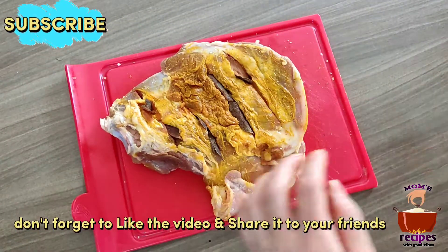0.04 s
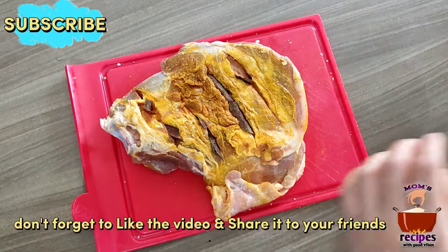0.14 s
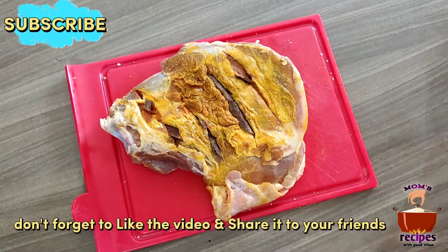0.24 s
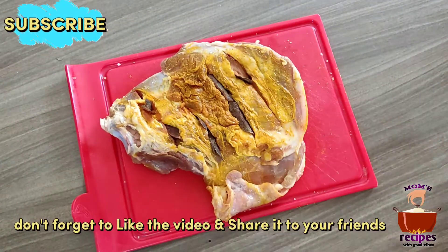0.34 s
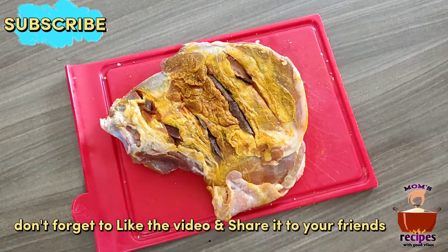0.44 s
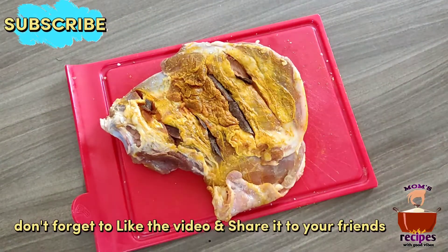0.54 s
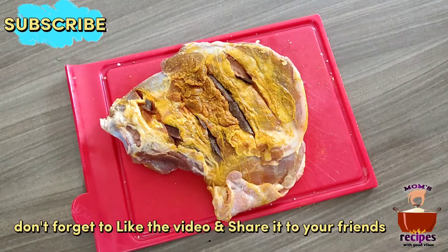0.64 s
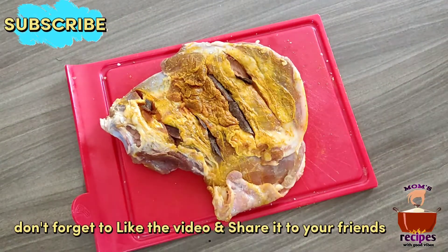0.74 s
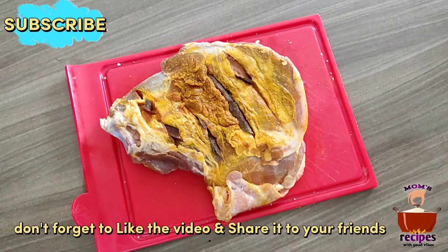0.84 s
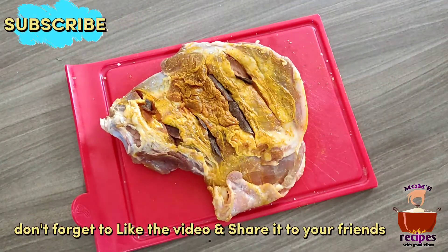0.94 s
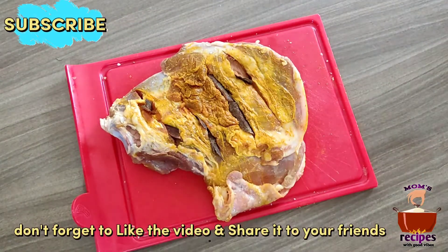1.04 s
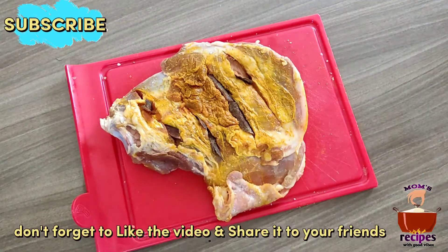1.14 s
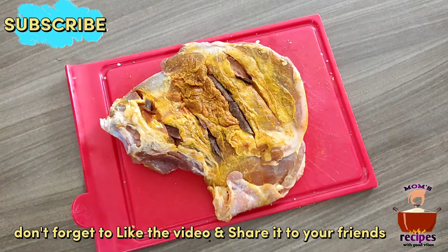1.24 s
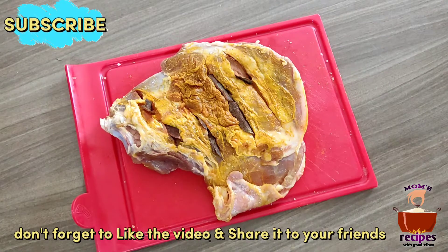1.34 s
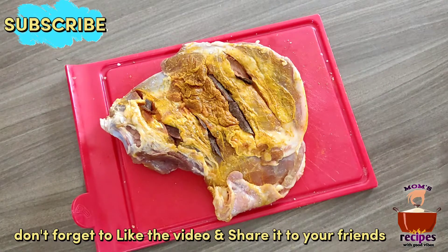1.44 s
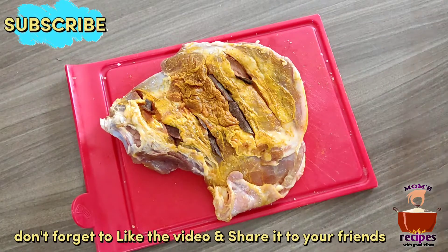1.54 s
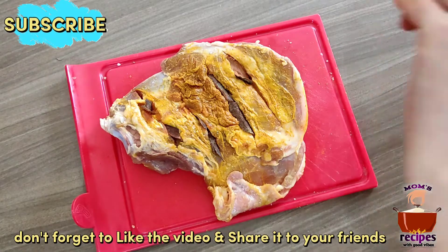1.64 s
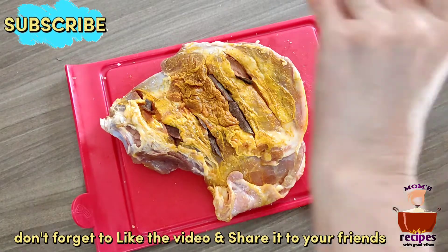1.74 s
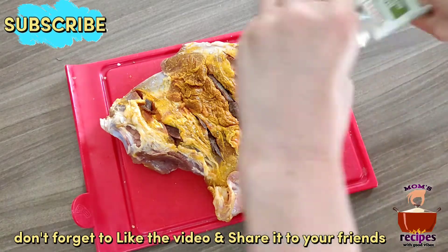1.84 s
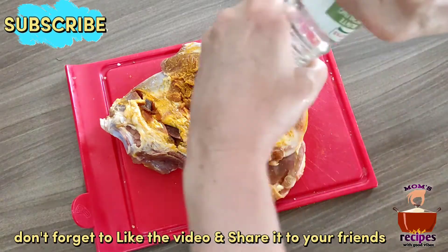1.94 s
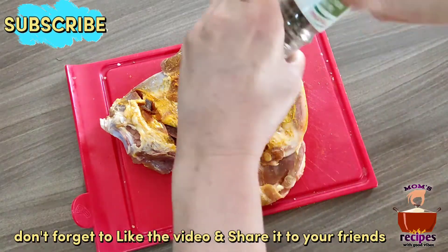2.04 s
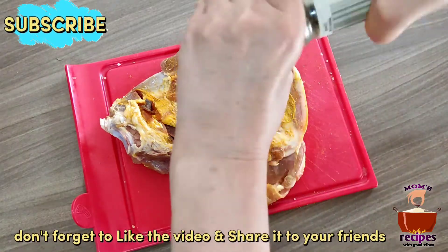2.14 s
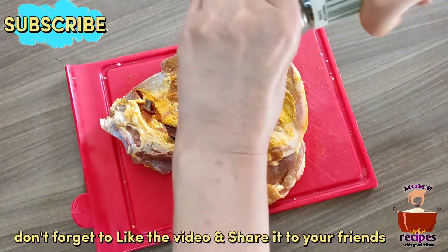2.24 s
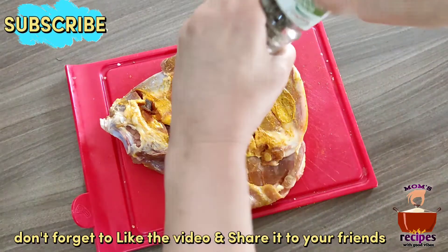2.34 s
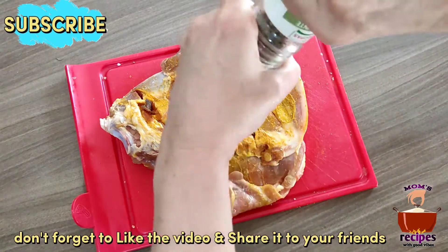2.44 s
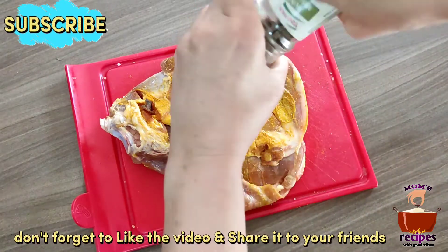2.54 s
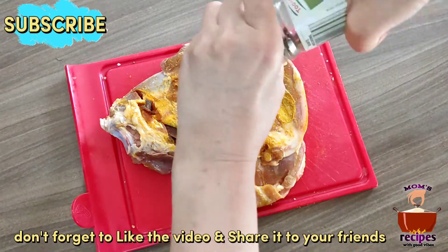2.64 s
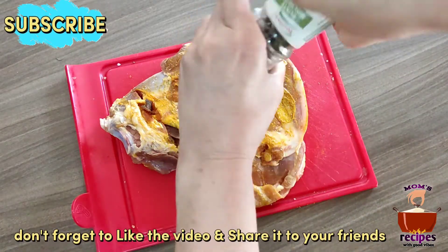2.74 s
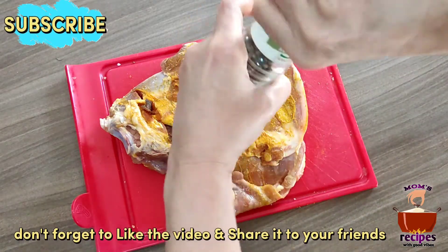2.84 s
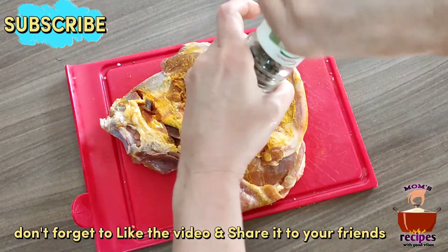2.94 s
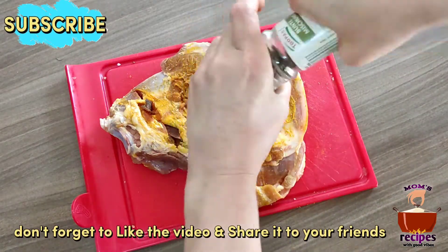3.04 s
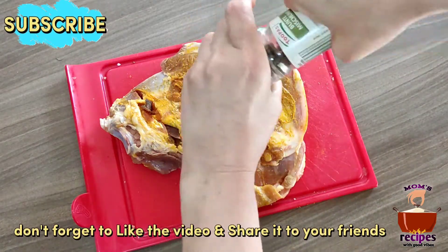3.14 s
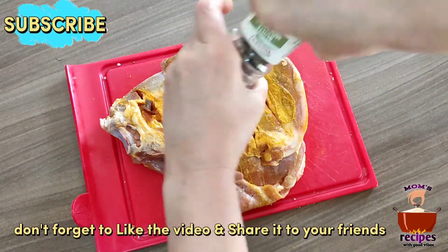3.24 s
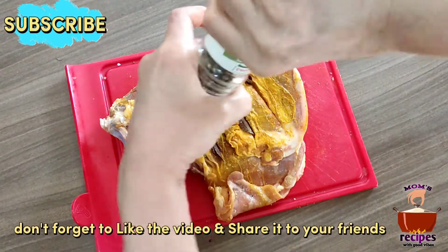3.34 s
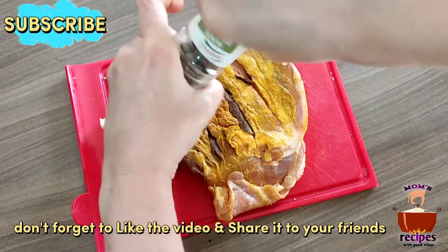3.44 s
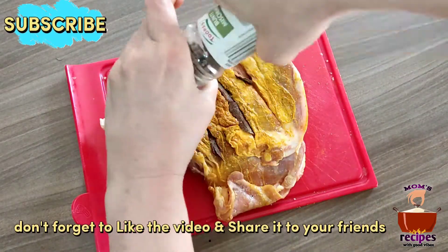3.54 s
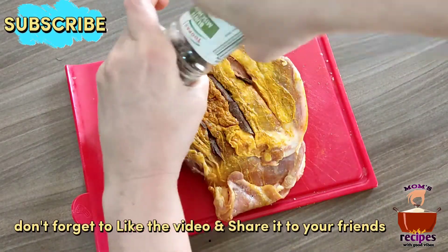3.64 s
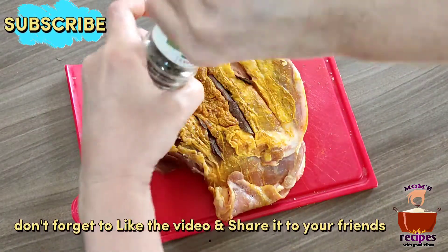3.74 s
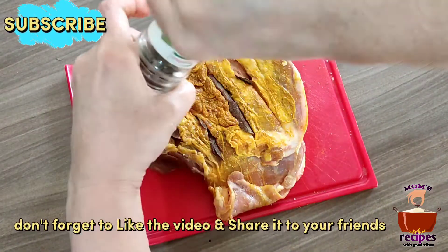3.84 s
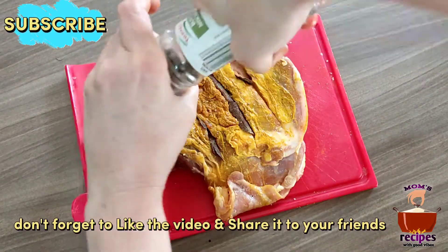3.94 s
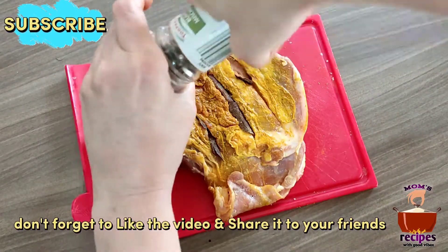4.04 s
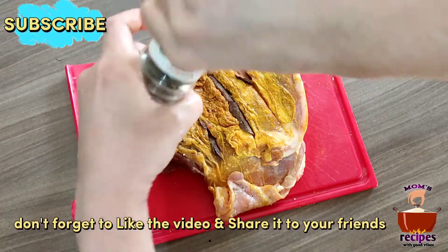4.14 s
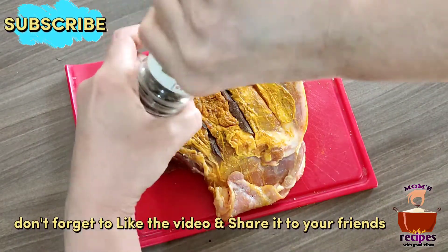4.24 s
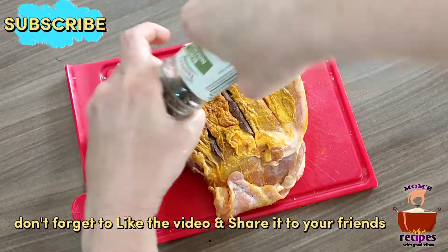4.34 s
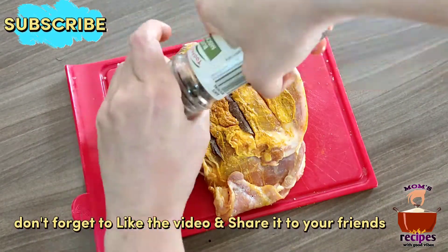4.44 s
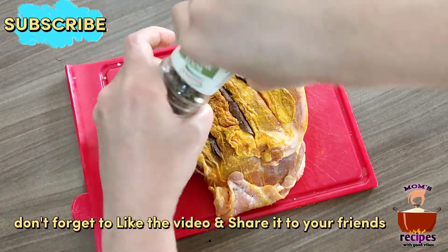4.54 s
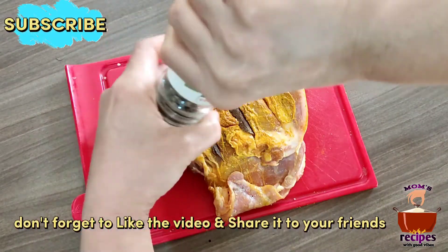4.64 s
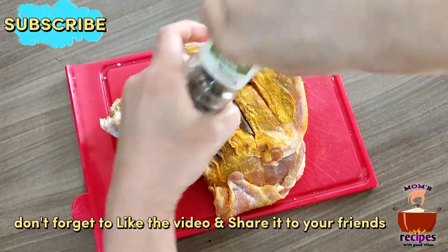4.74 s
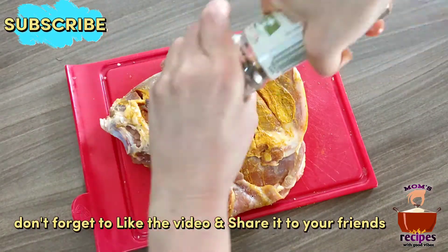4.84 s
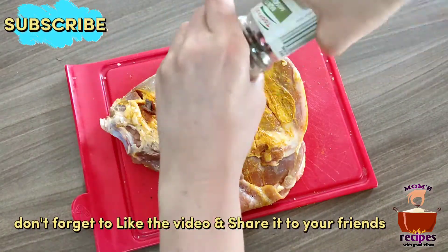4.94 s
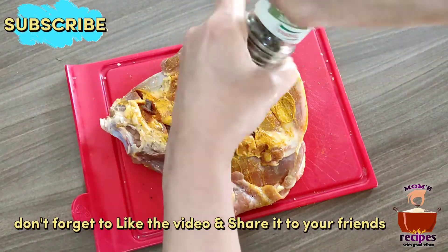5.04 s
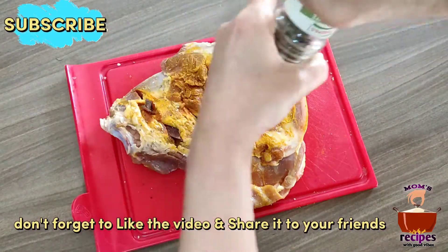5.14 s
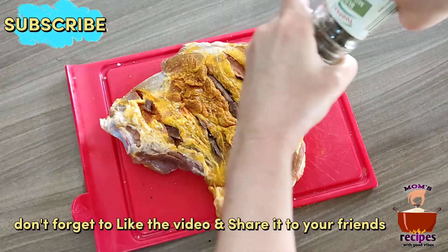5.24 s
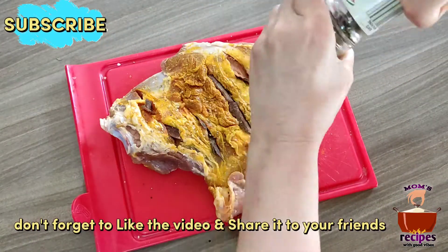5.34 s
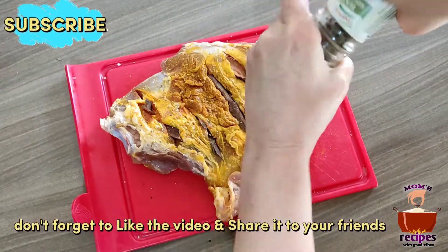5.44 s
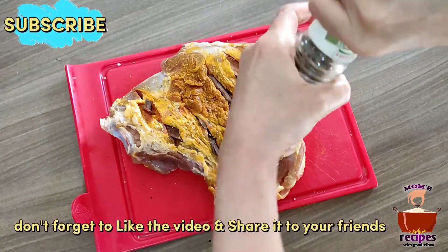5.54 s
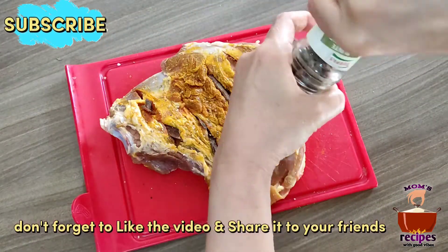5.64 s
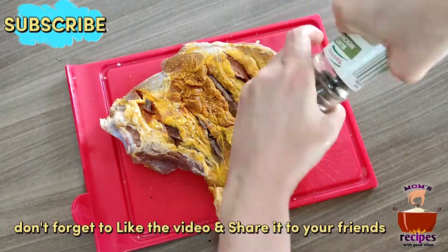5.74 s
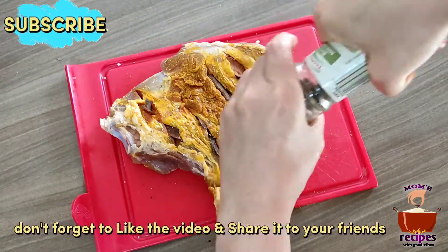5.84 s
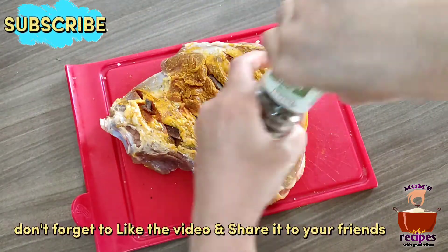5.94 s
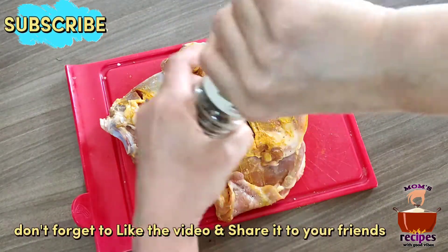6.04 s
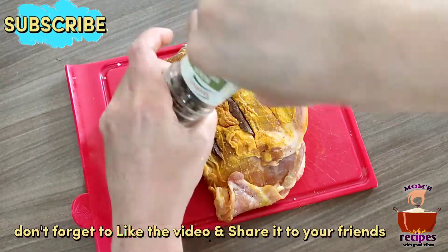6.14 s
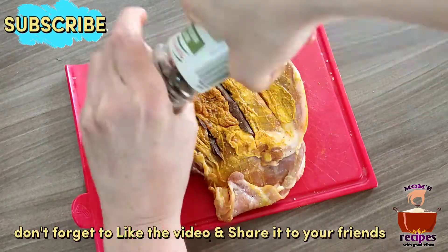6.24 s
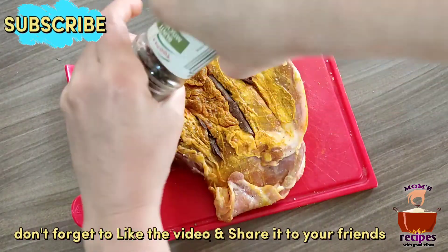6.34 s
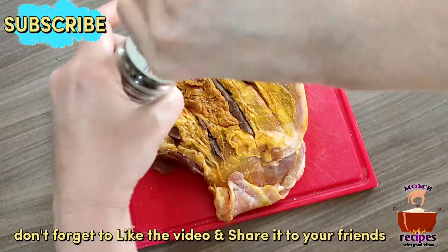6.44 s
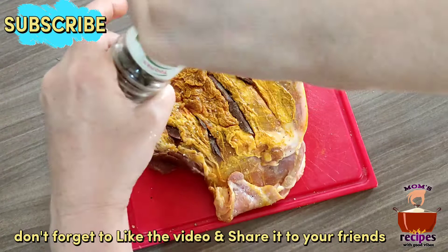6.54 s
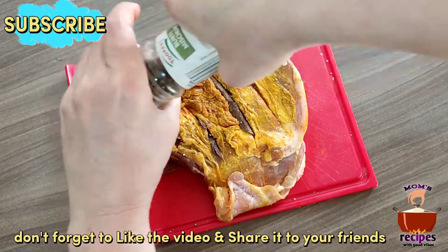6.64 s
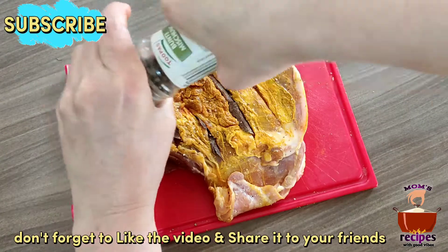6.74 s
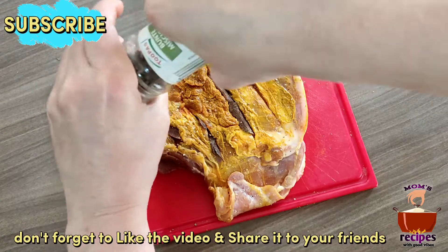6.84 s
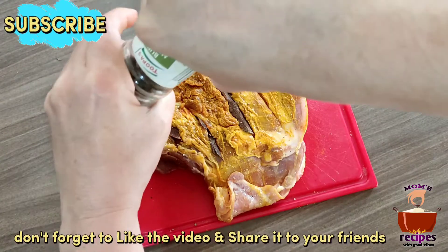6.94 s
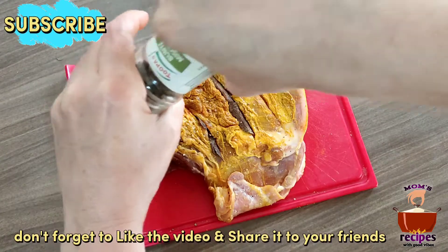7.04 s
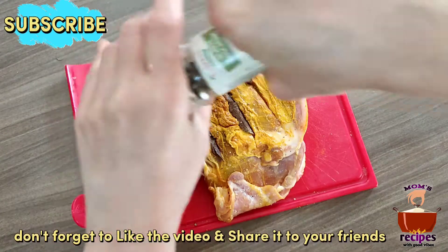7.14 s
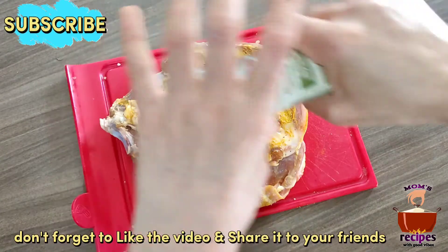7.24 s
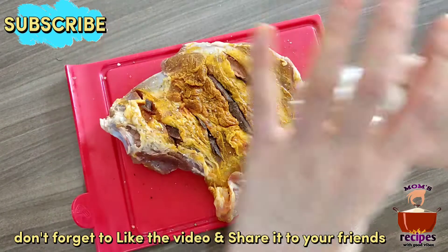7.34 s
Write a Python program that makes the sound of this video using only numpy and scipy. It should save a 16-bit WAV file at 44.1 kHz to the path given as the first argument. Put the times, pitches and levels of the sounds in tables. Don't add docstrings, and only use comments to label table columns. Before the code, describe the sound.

A glass spice mill twists back and forth close up, peppercorns cracking sharply over crunchy grit, after a soft jar rattle in a quietly humming kitchen.

```python
import sys
import numpy as np
from scipy import signal
from scipy.fft import rfft, irfft, next_fast_len
from scipy.io import wavfile
from scipy.ndimage import map_coordinates

SR = 44100
rng = np.random.default_rng(int(sys.argv[2]) if len(sys.argv) > 2 else 0)


def master_out(mix):
    frames = np.transpose(np.atleast_2d(mix))
    ceiling = np.clip(frames, -1, 1)
    pcm = np.round(ceiling * 32767).astype(np.int16)
    wavfile.write(sys.argv[1], SR, pcm)


def ratio_of_db(decibels):
    return 10 ** (np.asarray(decibels, float) / 20)


N = 325692


def unit(x):
    return x / np.sqrt(np.mean(x ** 2) + 1e-20)


def along(points, hz):
    f, v = np.transpose(points)
    return np.interp(np.log(hz + 1), np.log(f + 1), v)


def wander(per_second, points):
    return map_coordinates(rng.standard_normal(points), [np.arange(N) * per_second / SR])


def filtered(x, response):
    m = next_fast_len(N + SR // 2)
    return irfft(rfft(x, m) * response(np.fft.rfftfreq(m, 1 / SR)), m)[..., :N]


def causal(spectrum):
    def response(hz):
        cepstrum = irfft(np.log(ratio_of_db(along(spectrum, hz)) + 1e-4))
        half = len(cepstrum) // 2
        cepstrum[1:half] *= 2
        cepstrum[half + 1:] = 0
        return np.exp(rfft(cepstrum))
    return response


def resonant(modes):
    def response(f):
        total = 0
        for k, (centre, width, db) in enumerate(modes):
            total = total + (-1) ** k * ratio_of_db(db) * 1j * f * width / (centre ** 2 - f * f + 1j * f * width)
        return response_or_zero(total)

    def response_or_zero(total):
        return total
    return response


def place(s, bursts):
    at = np.round(np.asarray(s) * SR).astype(int)[:, None] + np.arange(bursts.shape[1])
    return np.bincount(at.ravel(), bursts.ravel(), N + bursts.shape[1])[:N]


# delay in seconds, left level in dB, right level in dB.
ECHOES = [(.0013, -54, -7.5), (.0043, -42, -7), (.0085, -12, -20)]
# time in seconds, left over right in dB.
SHADE = [(1.1, -5.5), (1.18, -6.5), (1.37, -3), (1.41, -2), (1.97, -5.5), (2.07, 1.5), (2.45, -8.5),
         (2.88, 0), (2.92, -8), (3.09, 0), (3.17, -5), (4.94, -4), (5.2, -7.5), (5.32, 3.5), (5.41, -9),
         (6.25, -1), (6.33, -6), (6.9, -0.5)]
HOVER, HOVERS_PER_S = 0.06, 3


def mill():
    snaps, sizzles, knocks, jolts, rings = cracks()
    grains, rubbing = grit()
    grains = grains + crumble()
    dry = filtered(snaps + grains, causal(SNAP))
    dry += filtered(sizzles + ratio_of_db(-1.5) * grains, causal(SIZZLE))
    dry += filtered(knocks, lambda hz: (1j * hz / (1j * hz + 700)) ** 2)
    dry += held(jolts + rubbing + ratio_of_db(-12.5) * grains)
    rings = filtered(rings, causal(SNAP))
    far = dry.mean(0) + ratio_of_db(-3.0) * rings
    dry += rings
    near = dry.copy()
    height = 1 + HOVER * wander(HOVERS_PER_S, 100)
    for delay, left_db, right_db in ECHOES:
        when = np.arange(N) - delay * SR * height
        echo = [map_coordinates(one, [when], order=1) for one in dry]
        near += ratio_of_db([[left_db], [right_db]]) * echo
    s, shade_db = np.transpose(SHADE)
    shade_db = np.interp(np.arange(N) / SR, s, shade_db - shade_db.mean())
    return ratio_of_db(shade_db * [[.5], [-.5]]) * ports(near + ratio_of_db(-8.5) * walls(far, piece_s=.12))


# frequency in Hz, level in dB.
SNAP = [(1800, -26), (3000, -17.5), (4000, -12.5), (4800, -12), (5800, -2.5), (6500, -5), (8600, 1.5),
        (9700, -1.5), (11000, -28), (13000, -39.5)]
# frequency in Hz, level in dB.
SIZZLE = [(8500, -35.5), (10500, -0.5), (12500, -6.5), (14000, -13), (14800, -24), (16500, -32)]
CORN_SHARDS_HZ = [4600, 6800, 5180, 5940, 5830, 5850, 5620, 6200, 5400, 6640, 6370, 6750, 6140, 5830, 5400,
                  6000, 5520, 6800, 5100, 5860, 5700, 5000, 5850, 5770, 5590]
TEAR_RISE, TEAR_HANGS, TEAR_DULLS = 0.71, 0.68, 2.24
SHARD_HZ, SHARD_SPREAD, SHARD_DB, SHARD_S = 6120, 0.236, -4, 0.006
SPIKE, SPIKE_S = 0.9, 0.002
CREAK_S, CREAK_DB, CREAK_FROM_DB = 0.0096, 4, -23


def cracks():
    s, db, body_db, hz, sizzle_db, body_hz, tear = pieces()[:, :, None]
    start = s[:, 0]
    t = np.arange(700) / SR
    noise = rng.standard_normal((len(s), 4, len(t)))
    rise = 1 - np.exp(-t / (0.0001 + TEAR_RISE * tear ** 2 / 1000))
    clean = 1.06 / (1 + TEAR_DULLS * tear)
    hang = 1 + TEAR_HANGS * tear

    shard_hz = SHARD_HZ * np.exp(SHARD_SPREAD * noise[:, 0, -1:])
    shard_hz[:len(CORNS), 0] = CORN_SHARDS_HZ
    ring = 0.64 * ratio_of_db(-60 * t / 0.01) * np.sin(2 * np.pi * hz * t)
    ring = ring + ratio_of_db(SHARD_DB - 60 * t / SHARD_S) * np.sin(2 * np.pi * shard_hz * t)
    rings = place(start, ratio_of_db(db + 5.5) * rise * clean * ring)

    fade = 0.83 * ratio_of_db(-60 * t / 0.02 / hang) + clean * SPIKE * ratio_of_db(-60 * t / SPIKE_S)
    splinters = fade * (0.32 * noise[:, 0] + 0.69 * noise[:, 1:3].transpose(1, 0, 2))
    snaps = [place(start, ratio_of_db(db + 4.0) * rise * one) for one in splinters]
    ahead = t[:round(CREAK_S * SR)]
    creaks = ratio_of_db(db + CREAK_DB + CREAK_FROM_DB * (9.0 - ahead / CREAK_S)) * noise[:, 3, -len(ahead):]
    snaps = snaps + place(start - CREAK_S, creaks)
    sizzles = [place(start, ratio_of_db(db + sizzle_db + 9.5) * rise * one) for one in splinters]

    mode = 0.13 * ratio_of_db(-60 * t * body_hz / 40) * np.sin(2 * np.pi * body_hz * t)
    mode = mode * (1 - np.exp(-t / 0.00011))
    knocks = place(start, ratio_of_db(db + body_db + 19.5) * clean * mode)
    jolts = place(start, rise * ratio_of_db(db + body_db + 4.5 - 60 * t / 0.012 / hang) * noise[:, 3])
    return np.array(snaps), np.array(sizzles), knocks, jolts, rings


# start in seconds, peak in dB, mill body in dB over the crack,
# ring in Hz, mill body in Hz.
CORNS = [(1.1885, -21, -44, 8150, 3930), (1.6057, -8, -13.5, 8340, 1560), (2.03, -5, -15, 7570, 1587),
         (2.0937, -5.5, -15.5, 6830, 1340), (2.554, -7, -6, 7660, 3550), (2.582, -15, -4, 7550, 3090),
         (2.602, -7, -9.5, 9250, 2040), (2.757, -8, -21, 6740, 3300), (2.789, -3.5, -24.5, 11800, 1204),
         (3.0277, -3.5, -15.5, 8520, 3300), (3.2614, -8, -20, 7050, 1520),
         (3.4711, -5.5, -12.5, 8800, 3230), (3.71, -10, -10, 5640, 2070),
         (3.8535, -10.5, -14.5, 6450, 3720), (3.866, -6.5, -29, 8300, 1650),
         (4.0603, -8, -19.5, 7720, 1820), (4.1654, -7.5, -12, 6200, 1633), (4.2645, -9, -12, 7800, 3080),
         (4.286, -11, -17, 8640, 1750), (4.301, -5.5, -15.5, 8280, 1970), (4.733, -12, -14.5, 8300, 1950),
         (5.2536, -2, -15, 8100, 3100), (5.9177, -8, -19.5, 6800, 1970), (6.151, -7.5, -8.5, 8960, 3520),
         (6.5872, -6.5, -19, 7960, 1985)]
# start in seconds, peak in dB, mill body in dB over the crack,
# mill body in Hz, tearing in ms.
HALVES = [(1.705, -18, -11.5, 2140, 0.85), (2.082, -11, -11.5, 1770, 0.42), (2.1377, -11.5, -9, 1630, 0.16),
          (2.281, -16.5, -10.5, 3300, 0.4), (2.359, -35, -18, 2020, 0.48), (2.4962, -18.5, -13, 1970, 0.05),
          (2.522, -11.5, -31, 2000, 0.26), (2.62, -13.5, -7, 3200, 0.46), (2.762, -7.5, -16, 1550, 0.42),
          (2.9418, -13.5, -18.5, 2650, 0.064), (3.4356, -13.5, -17, 1870, 0.063),
          (3.9102, -9.5, -14.5, 2780, 0.039), (4.11, -13.5, -12, 1870, 0.055),
          (4.3139, -11.5, -7.5, 1950, 0.4), (4.3192, -7.5, -26, 1700, 0.47), (4.5215, -12, -10, 1870, 0.3),
          (4.5696, -16.5, -19, 2280, 0.32), (4.7578, -10, -13, 1870, 0.069), (4.793, -9, -9.5, 2010, 0.5),
          (4.8119, -10.5, -18.5, 2100, 0.46), (4.8805, -12, -27, 2460, 0.044),
          (5.015, -18.5, -12, 2180, 0.058), (5.068, -13.5, -17, 2320, 0.33),
          (5.219, -11.5, -13.5, 2350, 0.2), (5.452, -15.5, -14, 2460, 0.23), (5.6773, -11, -35, 1600, 0.05),
          (5.685, -11, -41, 1940, 0.11), (5.6962, -8, -27, 2460, 0.86), (6.5443, -11, -21.5, 1430, 0.18)]
# start in seconds, peak in dB, tearing in ms.
CHIPS = [(2.127, -17, 0.18), (2.341, -21, 0.05), (2.513, -21, 0.41), (2.6058, -14, 0.46),
         (3.045, -14.5, 1.3), (3.2482, -17.5, 0.4), (3.416, -19.5, 1.05), (3.4844, -12, 0.29),
         (3.5, -20, 0.62), (3.516, -26, 0.17), (3.8694, -11.5, 0.055), (3.8854, -14, 1.1),
         (3.903, -20, 0.059), (4.065, -28, 0.05), (4.3886, -17.5, 0.45), (4.5116, -18, 1), (4.565, -9, 1.6),
         (4.7262, -16, 1.3), (4.8317, -19, 0.51), (5.466, -18, 0.21), (5.4882, -18.5, 0.076),
         (5.666, -17.5, 0.47), (5.723, -14.5, 0.99), (5.7398, -14, 0.61), (5.7575, -15.5, 0.37),
         (5.7862, -19, 0.51), (5.906, -18, 1.12), (5.951, -14.5, 1), (6.126, -18, 0.59),
         (6.178, -14.5, 0.05)]
# start in seconds, peak in dB.
TICKS = [(2.004, -33), (2.158, -25.5), (2.196, -25), (2.27, -18.5), (2.5364, -18), (2.719, -26),
         (2.734, -29), (2.9212, -25.5), (2.982, -27), (3.2055, -26), (3.6423, -34), (3.6494, -25),
         (3.827, -28), (3.839, -25), (4.375, -27), (4.4296, -28.5), (4.95, -28), (5.044, -21),
         (5.1863, -40), (5.43, -26.5), (5.507, -20), (5.625, -28), (5.6323, -24), (5.652, -38),
         (6.0998, -26), (6.116, -24.5), (6.3511, -26), (6.364, -29), (6.411, -25.5), (6.428, -23.5)]
# start in
# seconds, peak in dB.
LOOSE = [(1.5802, -23), (1.856, -21.5), (2.427, -29.5), (3.767, -29), (4.478, -33), (4.6228, -27.5),
         (4.6536, -33.5), (5.3306, -29), (5.373, -28), (5.9842, -27.5), (6.056, -37), (6.2677, -24.5),
         (2.473, -33), (3.383, -33.5), (5.518, -25.5), (5.8, -26), (6.321, -25), (6.565, -22), (6.766, -33),
         (6.832, -33), (7.002, -50), (7.164, -38)]
# start in seconds, peak in dB, tearing in ms.
CRUMBS = [(2.0744, -22, 0.34), (2.349, -18, 0.97), (2.3548, -13, 0.99), (2.4613, -36, 1.03),
          (2.464, -40, 0.08), (2.5885, -10, 0.21), (2.6363, -12, 0.093), (3.046, -15, 0.13),
          (3.4458, -17, 0.71), (3.5156, -25, 0.14), (3.6826, -26, 0.68), (3.7, -24, 0.25),
          (3.941, -25, 0.63), (4.0763, -22, 0.8), (4.1005, -30, 0.56), (4.136, -30, 0.75),
          (4.143, -24, 0.57), (4.28, -13, 0.7), (4.2885, -16, 0.05), (4.3782, -22, 0.64),
          (4.4157, -30, 0.8), (4.54, -28, 0.18), (4.631, -31, 0.05), (4.732, -17, 1.48), (4.753, -27, 1.13),
          (4.776, -23, 0.72), (4.8069, -12, 0.98), (4.8285, -18, 1.0), (4.915, -27.5, 0.38),
          (5.0027, -39, 0.47), (5.208, -23, 0.87), (5.478, -27, 0.6), (5.5226, -27, 0.7),
          (5.785, -37, 0.51), (5.799, -22, 0.48), (5.9106, -21, 0.78), (6.095, -30.5, 0.57),
          (6.131, -24, 0.05), (6.3575, -31.5, 0.2), (6.414, -41, 0.05), (6.4184, -37, 0.37),
          (6.5706, -21, 0.05)]
# start in seconds, peak in dB, ring in Hz.
SPECKS = [(.749, -39.5, 8600), (1.1139, -46, 6430), (1.1306, -31.5, 9000), (1.147, -32.5, 8850),
          (1.171, -38, 10800), (1.192, -32, 8500), (1.3523, -43, 11000), (1.6744, -31, 8590),
          (1.6804, -38, 8350), (1.6935, -41, 9240), (1.8055, -36, 8900), (2.016, -26, 7560),
          (2.2612, -38, 8700), (2.449, -36, 8450), (2.484, -24, 8750), (2.6314, -11.5, 8700),
          (2.7304, -25, 7300), (2.7814, -19.5, 9200), (2.9136, -36, 8930), (2.9518, -22, 8790),
          (3.0133, -36, 8400), (3.1364, -29, 7900), (3.194, -35, 8500), (3.5358, -33, 7310),
          (3.818, -38, 6100), (3.928, -24, 7830), (4.053, -40, 7800), (4.6115, -26, 8800),
          (4.671, -36, 8600), (4.6955, -43, 8300), (4.7466, -18, 8040), (4.9627, -36, 7810),
          (4.9848, -35, 7620), (4.997, -31, 8820), (5.282, -21.5, 7750), (5.5667, -32.5, 7670),
          (5.602, -38, 8500), (6.24, -28, 7640), (6.2807, -34, 7900), (6.3762, -31, 7860),
          (6.4684, -38, 8950), (6.501, -41, 8600), (6.5106, -44, 8800), (6.5208, -41, 7900)]
FINE_DB = [5, 2, 0, 2.5, 1, 2, 2.5, 0, -2, 2.5, 3, 5, 0, -2, 1.5, -3, -8, -1.5, -4, 1, 1, 0.5, -5, 5, 3, 4,
           1, .3, .3, .3, .3, 1, .3, 3, 0, -2, -1, .3, 4, 1, -1, 4, 3, 5, -2, -2.5, -2, -2, 2, .3, .3, 1,
           -1, -7]
RING_HZ, RING_SPREAD = 8300, 0.097
BODY_DB, BODY_HZ, BODY_SPREAD = -13.5, 2100, 0.19
SPECK_BODY_DB = -38
SIZZLE_DB, SIZZLE_GROWS, SIZZLE_SPREAD_DB = -5.5, 0.21, 5
CORN_TEAR_MS, SMALL_TEAR_MS = 0.2, 0.55


def pieces():
    small = CHIPS + [(*one, SMALL_TEAR_MS) for one in TICKS + LOOSE] + CRUMBS
    chance = rng.standard_normal((len(CORNS + HALVES + small + SPECKS), 3))
    ring = RING_HZ * np.exp(RING_SPREAD * chance[len(CORNS):, 0])
    body = BODY_HZ * np.exp(BODY_SPREAD * chance[:len(small), 1])
    fine_db = np.concatenate([FINE_DB, SIZZLE_SPREAD_DB * chance[len(FINE_DB):, 2]])

    whole = [(*row, CORN_TEAR_MS) for row in CORNS]
    broken = HALVES + [(s, db, BODY_DB, hz, tear) for (s, db, tear), hz in zip(small, body)]
    broken = [(*row[:3], hz, *row[3:]) for row, hz in zip(broken, ring)]
    specks = [(s, db, SPECK_BODY_DB, hz, BODY_HZ, SMALL_TEAR_MS) for s, db, hz in SPECKS]
    s, db, body_db, hz, body_hz, tear = np.transpose(whole + broken + specks)
    sizzle_db = SIZZLE_DB + SIZZLE_GROWS * db + fine_db
    return np.array([s, db, body_db, hz, sizzle_db, body_hz, np.abs(tear)])


def crumble():
    breaks = CORNS + HALVES + CHIPS + TICKS + LOOSE + CRUMBS + SPECKS
    s, db = np.transpose([row[:2] for row in breaks])
    t = np.arange(SR // 4) / SR
    power = ratio_of_db(2 * (db[:, None] - 18.5 - 60 * t / 0.1)) * (1 - np.exp(-t / 0.0018))
    settling = np.sqrt(place(s, power))
    grain = np.abs(rng.standard_normal(N // 30 + 1)).repeat(30)[:N]
    return settling * rng.standard_normal((2, N)) * grain


# start in seconds, length in seconds, level in dB,
# mill body in dB over the grit.
TWISTS = [(1.621, 0.1, -53, -1), (1.826, 0.053, -45.5, -1), (2.07, 0.11, -40.5, -7.5),
          (2.253, 0.12, -42.5, -14), (2.482, 0.11, -35.5, 0), (2.586, 0.048, -29.5, -8.5),
          (2.724, 0.036, -35.5, -11), (2.928, 0.06, -41, -13), (3.221, 0.12, -45, -16),
          (3.406, 0.106, -35.5, -15.5), (3.639, 0.069, -42, -2), (3.87, 0.084, -40, -5.5),
          (4.081, 0.04, -31, -15), (4.3, 0.095, -43, -12), (4.495, 0.088, -38.5, -14),
          (4.722, 0.043, -34.5, -10), (4.794, 0.065, -36, -18.5), (4.934, 0.088, -40.5, -8.5),
          (5.178, 0.025, -37, -6), (5.275, 0.011, -37, -10), (5.433, 0.052, -32.5, -30),
          (5.645, 0.057, -33, -16.5), (5.709, 0.084, -36, -3.5), (5.887, 0.029, -43, -47),
          (6.098, 0.03, -42.5, 0.5), (6.315, 0.075, -43, -12.5), (6.403, 0.037, -37, -15),
          (6.546, 0.0068, -27, -34)]
# time in seconds, level in dB.
BRUSH = [
    [(.56, -59), (.61, -38.5), (.68, -55), (.75, -47.5), (.9, -53)],
    [(1.05, -51), (1.2, -43), (1.45, -55)],
    [(1.6, -43), (4, -48.5), (6.75, -46)],
    [(7.1, -99.5), (7.17, -40), (7.3, -87)],
]
TAKE_UP_S, LET_GO_S, BITES_PER_S, BITE_DB = 0.0096, 0.009, 40, 4.5
GRAIN_TOP_DB = 9.5
GRAIN_HZ, GRAIN_SPREAD, GRAIN_RINGS = 4004, 0.716, 1.83


def grit(per_second=1500):
    s, length, db, body_db = np.transpose(TWISTS)[:, :, None]
    start = s[:, 0]
    t = np.arange(SR // 4) / SR
    pressure = np.clip(np.minimum(t / TAKE_UP_S, 1 + (length - t) / LET_GO_S), 0, 1)
    bites = ratio_of_db(BITE_DB * wander(BITES_PER_S, 1000))

    draw = rng.random((round(per_second * N / SR), 2))
    life = np.arange(90) / SR
    sizes = ratio_of_db(np.minimum(-3.5 * np.log(draw[:, 1:]), GRAIN_TOP_DB))
    hiss = rng.standard_normal((len(draw), len(life)))
    grain_hz = np.minimum(GRAIN_HZ * np.exp(GRAIN_SPREAD * hiss[:, -1:]), SR / 3)
    tone = np.sin(2 * np.pi * grain_hz * life)
    snaps = sizes * ratio_of_db(-60 * life / 0.0042) * (hiss + GRAIN_RINGS * tone)
    grains = unit(place(draw[:, 0] * N / SR, snaps)) * bites

    brush = 0
    for stroke in BRUSH:
        at, stroke_db = np.transpose(stroke)
        brush = brush + ratio_of_db(np.interp(np.arange(N) / SR, at, stroke_db, left=-120, right=-120))
    brush = brush * rng.standard_normal(N)
    crushed = place(start, ratio_of_db(db + 6.0) * pressure) * grains + ratio_of_db(-7.0) * brush
    rubbing = place(start, ratio_of_db(db + body_db - 0.5) * pressure) * grains
    return crushed, rubbing


# centre in Hz, width in Hz, level in dB.
MILL = [(1152, 430, -2.5), (1693, 503, 9.5), (2080, 863, 9), (3290, 1040, 3.5)]
# time in seconds, centre in Hz.
GRIP = [(1.6, 1880), (1.78, 1610), (1.9, 2250), (2.0, 1664), (2.78, 2570), (2.82, 1840), (2.96, 1580),
        (3.01, 2950), (3.27, 1730), (3.62, 2370), (4.08, 1925), (5.92, 2330), (5.97, 3100), (6.09, 1930),
        (6.26, 2110), (6.41, 1370), (6.46, 1830), (6.7, 2140)]
GRIP_HZ, SLACK, TIGHT = 1950, 0.807, 1.357


def held(x):
    s, hz = np.transpose(GRIP)
    grip = np.interp(np.arange(N) / SR, s, np.log(hz / GRIP_HZ))
    shifts = np.array([SLACK, 1, TIGHT])
    total = 0
    for shift, pick in zip(shifts, np.eye(len(shifts))):
        share = np.interp(grip, np.log(shifts), pick)
        total = total + filtered(np.sqrt(share) * x, lambda f: resonant(MILL)(f / shift))
    return total


# frequency in Hz, left over right in dB.
PORTS_DB = [(500, -0.5), (1300, 4), (2400, 0), (5000, 0.5), (8500, -8.5), (11000, 7), (14000, 4.5)]
# frequency in Hz, radians by which left leads.
PORTS_TURN = [(100, 1), (1700, -1.36), (2700, -1.5), (3700, -2), (6000, -8), (8600, -7.5), (11400, -12.5),
              (16000, -16)]


def ports(x):
    side = np.array([[1], [-1]])
    return filtered(x, lambda hz: ratio_of_db(side * along(PORTS_DB, hz) / 2)
                    * np.exp(.5j * side * along(PORTS_TURN, hz)))


# frequency in Hz, seconds to fade by 60 dB.
KITCHEN = [(200, 0.5), (1200, 0.47), (2000, 0.47), (8000, 0.34), (14000, 0.2)]


def walls(x, piece_s):
    step = round(piece_s * SR)
    out = np.zeros((2, N + SR))
    for a in range(0, N, step):
        if np.abs(x[a:a + step]).max() < 1e-4:
            continue
        hz, t, z = signal.stft(rng.standard_normal((2, SR // 2)), SR, nperseg=256)
        tail = signal.istft(z * ratio_of_db(-60 * t / along(KITCHEN, hz)[:, None]), SR, nperseg=256)[1]
        tail *= 1 - np.exp(-np.arange(tail.shape[1]) / SR / 0.00024)
        wet = signal.fftconvolve(x[None, a:a + step], tail / np.linalg.norm(tail[0]), axes=1)
        out[:, a:a + wet.shape[1]] += wet
    return out[:, :N]


# start in seconds, peak in dB, hardness in Hz.
KNOCKS = [
    (0.725, -31, 600),
    (.736, -30.5, 1500),
    (0.746, -24.5, 2480),
    (0.757, -34, 5000),
    (.768, -38.5, 2500),
    (.79, -57, 1500),
]
# frequency in Hz, level in dB.
COUNTER = [(88, -51), (150, -18), (243, -0.5), (469, -2), (553, -2.5), (847, 0), (920, -18), (1080, -8),
           (3170, -26), (4000, -17), (5200, -67), (8800, -120)]
# centre in Hz, width in Hz, level in dB.
JAR = [(284, 82, -9), (344, 17, -8), (550, 11, 1), (740, 27, -7), (828, 18, -5), (1070, 46, -27),
       (1630, 36, 2), (1870, 91, -21)]


def jar():
    s, db, hard_hz = np.transpose(KNOCKS)
    t = np.arange(800) / SR
    soft = 1 / (1 + (np.fft.rfftfreq(len(t), 1 / SR) / hard_hz[:, None]) ** 2)
    rattle = irfft(rfft(rng.standard_normal((len(s), len(t)))) * soft, len(t))
    thud = filtered(place(s, ratio_of_db(db[:, None] + 22.5 - 60 * t / 0.036) * rattle), causal(COUNTER))
    thud = filtered(thud, lambda hz: 0.59 + 0.49 * resonant(JAR)(hz + 1e-3))
    late = np.pad(thud, (16, 0))[:N]
    boom = walls(thud[:SR * 2], piece_s=8)
    boom = 1.05 * boom + 0.55 * boom.mean(0)
    return np.array([late, thud]) * ratio_of_db([[-1.5], [2.5]]) + ratio_of_db(-4.0) * boom


# frequency in Hz, level in dB.
HUM = [(12, -28), (20, 4.5), (71, -3.5), (163, -13.5), (206, -15), (507, -18.5), (630, -22), (1500, -31),
       (1950, -70), (3300, -120)]
# centre in Hz, width in Hz, level in dB.
MOTORS = [(67.3, 17, -2.5), (201.3, 7.3, 9.5), (298, 10.4, 4.5), (411, 10, -9)]
# frequency in Hz, likeness from 0 to 1.
ALIKE = [(60, 0.81), (250, 0.86), (600, 0.68), (1500, 0)]
# frequency in Hz, level in dB.
HISS = [(500, 4.5), (1200, -1), (2500, -2), (6500, -4), (8000, -5.5), (8900, 4.5), (9800, -2),
        (10500, -2.5), (13500, -7.5), (15500, -8.5)]


def room():
    def shared_and_opposed(hz):
        colour = ratio_of_db(along(HUM, hz)) * (1 + np.abs(resonant(MOTORS)(hz + 1e-3)))
        turn = np.arccos(np.clip(along(ALIKE, hz), -1, 1)) / 2
        return colour * [np.cos(turn), np.sin(turn)]
    mid, side = filtered(rng.standard_normal((2, N)), shared_and_opposed)
    hum = unit(np.array([mid + side, mid - side]))
    hiss = unit(filtered(rng.standard_normal((2, N)), lambda hz: ratio_of_db(along(HISS, hz))))
    return ratio_of_db(-51.0) * hum + ratio_of_db(-58.5) * hiss


def scene():
    return mill() + jar() + room()


# time in seconds, level in dB.
DUCKS = [
    (1.62, -4.5),
    (3.04, -12),
    (3.48, -6),
    (5.27, -6),
    (6.165, -9),
    (6.6, -7),
]
DUCK_HZ, DUCK_IN_S, DUCK_HOLD_S, DUCK_OUT_S = 500, 0.01, 0.064, .04


def ducked(x):
    t = np.arange(N) / SR
    dip_db = 0
    for s, db in DUCKS:
        fall = (t - s) / DUCK_IN_S
        back = 1 + (s + DUCK_HOLD_S - t) / DUCK_OUT_S
        dip_db = dip_db + db * np.clip(np.minimum(fall, back), 0, 1)
    return x - (1 - ratio_of_db(dip_db)) * filtered(x, lambda hz: 1 / (1 + (hz / DUCK_HZ) ** 4))


def roll_off(x):
    return signal.sosfilt(signal.butter(12, 16610, fs=SR, output="sos"), x)


def record(dry):
    rounded = dry / (1 + np.abs(dry / .85) ** 4) ** (1 / 4)
    mix = filtered(ducked(rounded), lambda hz: hz < 16600)
    return roll_off(mix)


dry = scene()
out = record(dry)
master_out(out)
```